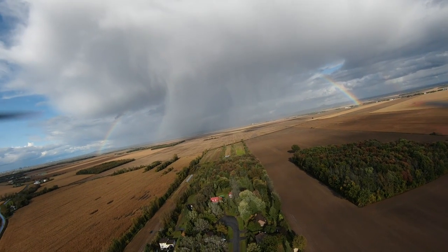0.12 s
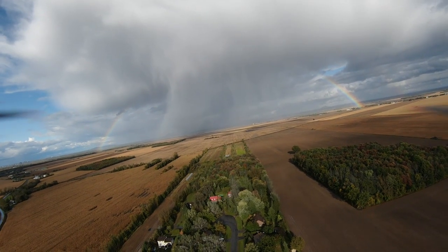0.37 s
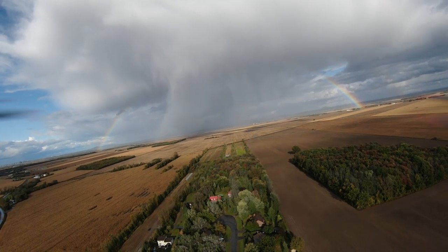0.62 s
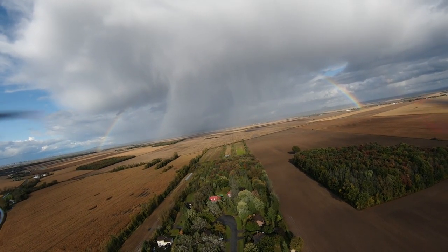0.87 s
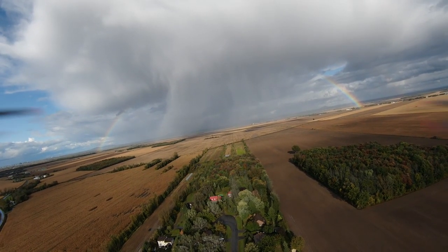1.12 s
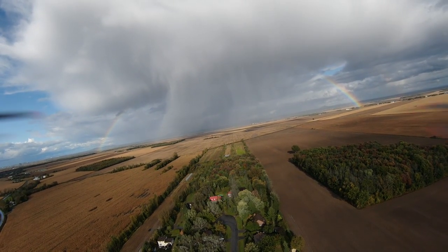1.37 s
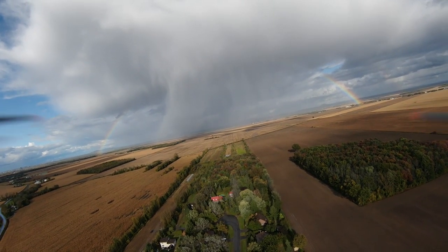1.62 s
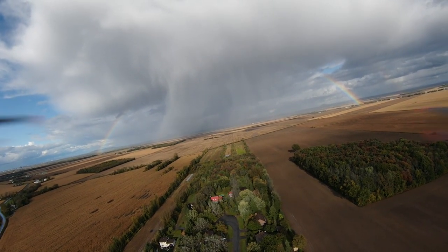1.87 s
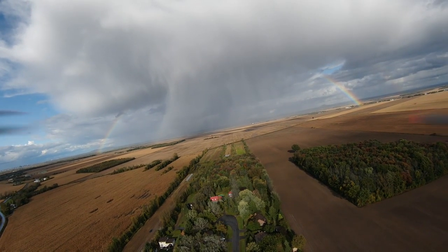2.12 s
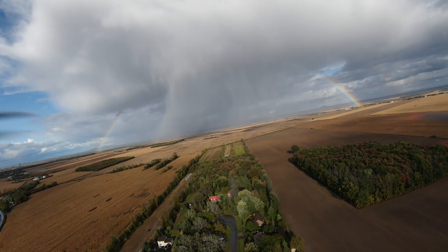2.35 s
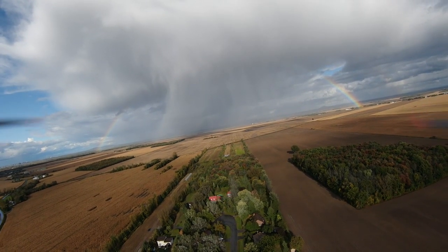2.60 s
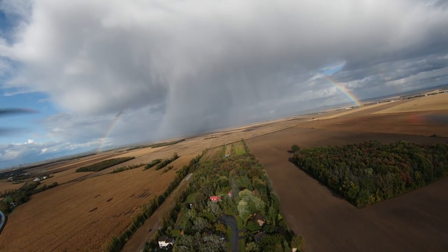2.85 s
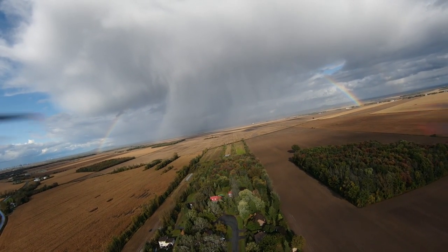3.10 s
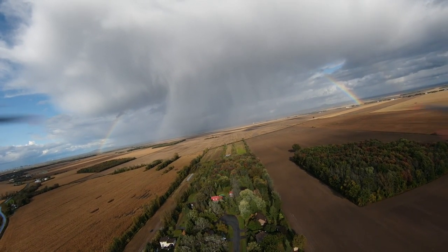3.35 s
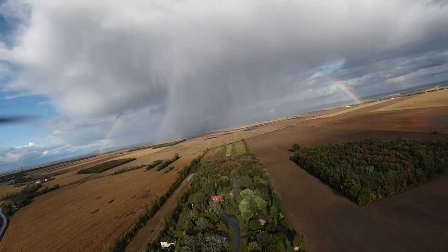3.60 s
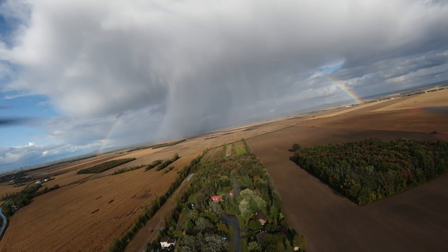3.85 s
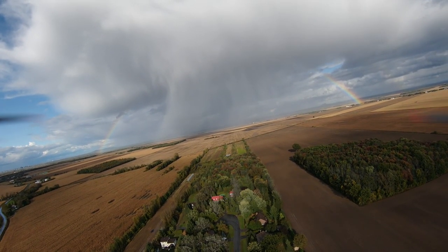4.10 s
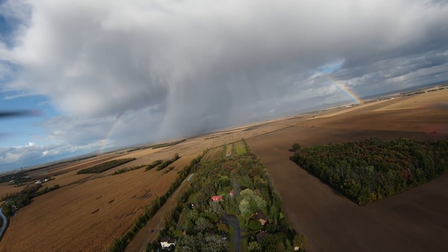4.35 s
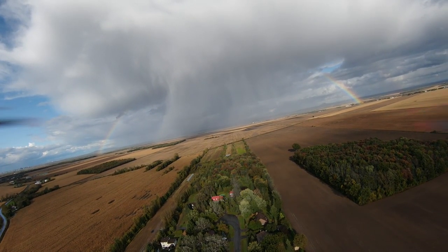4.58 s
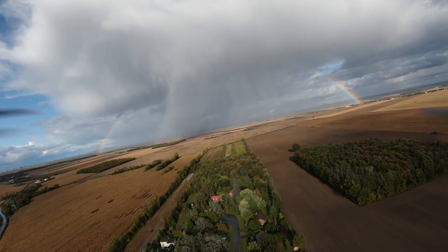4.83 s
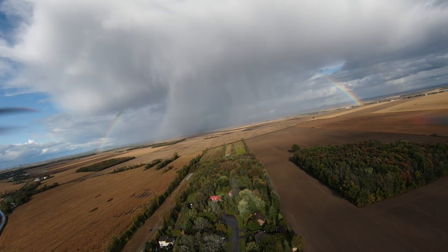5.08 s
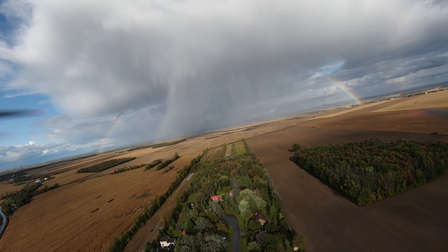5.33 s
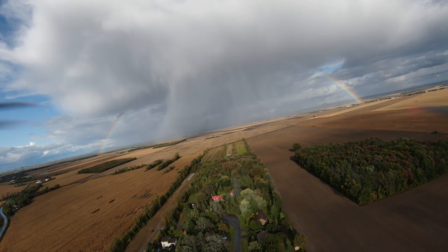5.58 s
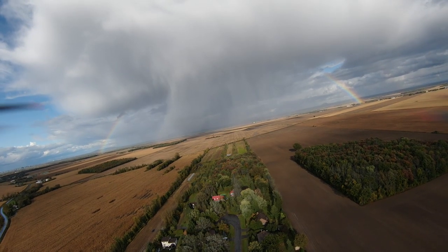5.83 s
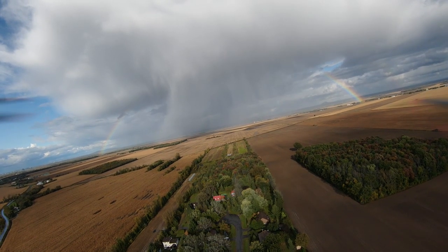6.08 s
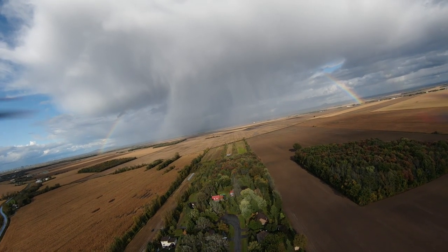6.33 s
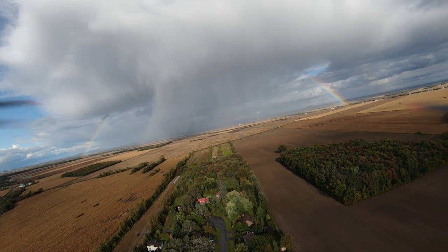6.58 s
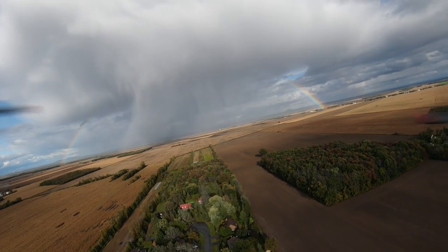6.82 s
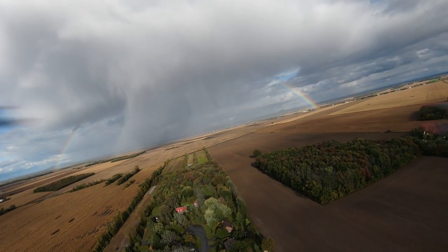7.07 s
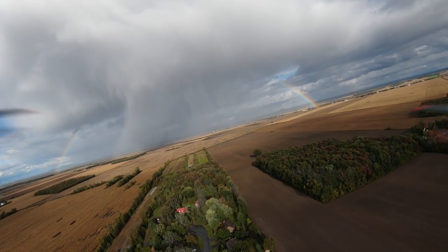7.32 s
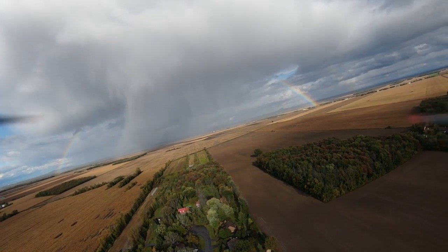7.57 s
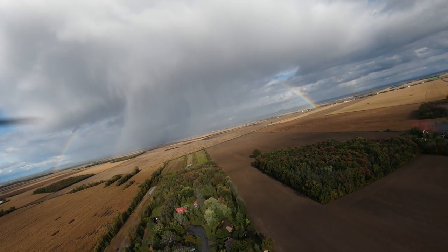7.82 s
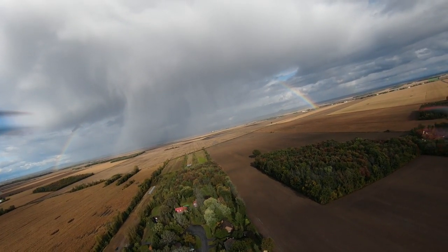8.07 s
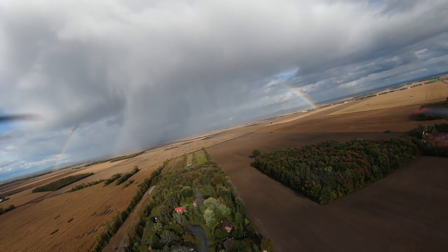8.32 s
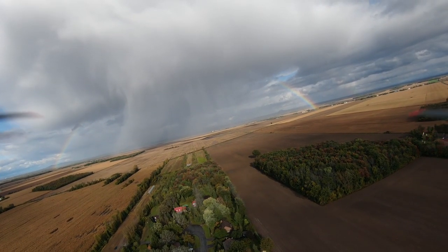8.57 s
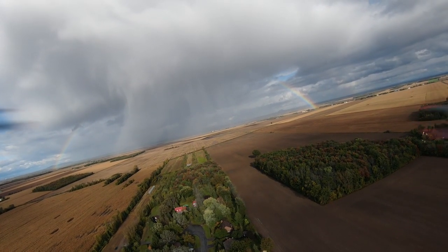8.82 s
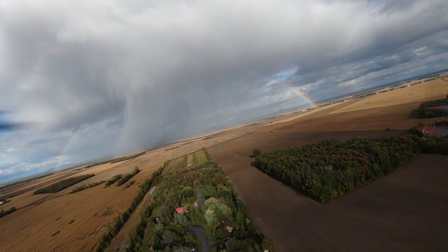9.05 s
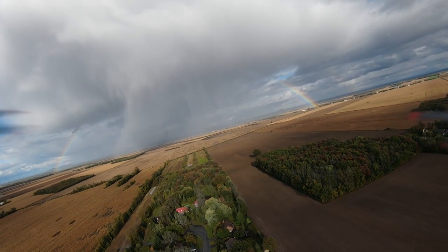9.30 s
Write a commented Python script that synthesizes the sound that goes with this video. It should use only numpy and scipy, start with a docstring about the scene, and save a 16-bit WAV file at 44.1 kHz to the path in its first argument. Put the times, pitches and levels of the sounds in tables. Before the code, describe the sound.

Four small drone motors hum and buzz steadily, their close tones beating together over rushing air, with one quick stumble and surge partway through.

```python
"""On the frame of a small drone in flight: four three-blade propellers at the two microphone ports of a camera.
Each motor is a stack of sines on its shaft orders; the motors turn at their own speeds, so their tones beat.
A short stick movement at 6.6 s makes the near and middle motors dip and the right one surge.
Shaped noise for blade turbulence and head wind fills the gaps; the camera cuts the treble steeply and adds faint hiss."""
import sys
import numpy as np
from scipy import signal
from scipy.fft import rfft, irfft, next_fast_len
from scipy.io import wavfile
from scipy.ndimage import uniform_filter1d, map_coordinates

SR = 44100
rng = np.random.default_rng(int(sys.argv[2]) if len(sys.argv) > 2 else 0)


def transcribe(u):
    """Save the signal u as a 16-bit wav file named by the first command-line argument.

    u: samples, shape (n,) or (channels, n), limited to [-1, 1]; the rate is SR.
    q: integer samples, one column per channel.
    """
    v = np.clip(np.atleast_2d(u).T, -1, 1)
    q = np.round(v * 32767).astype(np.int16)
    wavfile.write(sys.argv[1], SR, q)


def decibels_to_gain(level_db):
    """Convert a level in decibels to a linear amplitude gain (20 dB per decade)."""
    exponent = np.asarray(level_db, float) / 20
    return 10 ** exponent


N = 415863  # samples, 9.43 s


def along(hz, at_hz, values):
    """Values read on a log frequency axis."""
    return np.interp(np.log(hz + 1), np.log(np.asarray(at_hz) + 1), values)


def curves(rows):
    """One value per sample for each column after the time."""
    seconds, *columns = np.transpose(rows)
    return [np.interp(np.arange(N) / SR, seconds, column) for column in columns]


def wobble(rate):
    """A smooth random curve, rate knots a second, drawn as a spline every 64 samples."""
    knots = rng.standard_normal(N // 400)
    positions = np.arange(0, N + 64, 64) * rate / SR
    return map_coordinates(knots, [positions]).repeat(64)[:N]


def filtered(x, response):
    """x times a complex response of frequency."""
    m = next_fast_len(N + SR // 4)
    return irfft(rfft(x, m) * response(np.fft.rfftfreq(m, 1 / SR)), m)[..., :N]


# Frame resonances that lift a tone passing through them:
# (centre [Hz], half-width [Hz], left lift [dB], right lift [dB], added to the left port's lead [rad])
FRAME_RESONANCES = [(1026, 36, 3, 3, 0.00026), (2014, 32, 7.5, 6.5, 0.0018), (2423, 16, 1, 6.5, 0.0054),
                    (7900, 280, -0.5, 10, 0), (8340, 190, 7.5, 7.5, 0.00046)]
# The drone's attitude turns the propellers towards the camera after the stick movement;
# added to the blade tone and its octave: (time [s], level [dB])
ATTITUDE_LIFT = [(0, 0.5), (6.6, 0.5), (6.8, 1), (9.43, 2)]


def motor(speed, tones, arm, correct_percent, hunt, flutter_db, rough, load_db):
    """Sines on the shaft orders; the speed controller hunts a little and uneven inflow makes the tones flutter."""
    # the flight controller's small corrections, then the hunting of the speed controller
    blade_hz = curves(speed)[0] * (1 + correct_percent / 100 * wobble(16))
    shaft_hz = blade_hz / 3 * (1 + hunt * wobble(40))
    turn = 2 * np.pi * np.cumsum(shaft_hz) / SR
    faster_percent = 100 * (blade_hz / blade_hz.mean() - 1)
    out = np.zeros((2, N))
    for order, left_db, right_db, lead in tones:
        lift = 0
        for hz, half_width, *peak in FRAME_RESONANCES + arm:
            closeness = 1 / (1 + ((order * shaft_hz[::16] - hz) / half_width) ** 2)
            lift = lift + np.outer(peak, closeness)
        lift = lift.repeat(16, axis=1)[:, :N]
        lift_db, lead = lift[:2], lead + lift[2]
        if order in (3, 6):
            lift_db = lift_db + curves(ATTITUDE_LIFT)[0]
        if order == 3:
            lift_db = lift_db + load_db * faster_percent  # thrust changes the blade tone, dB per % of speed
        if order > 20:
            depth_db = 1.2  # the magnet whine flutters by a small fixed amount, alike for all motors
        elif order > 2:
            depth_db = flutter_db * min(order - 2, 5) ** rough  # higher orders feel the turbulence more
        else:
            depth_db = 3
        flutter = depth_db * (0.087 * wobble(4.0) + 0.81 * wobble(26))
        size = np.sqrt(2) * decibels_to_gain(lift_db + flutter)  # peak of a sine from its rms level
        smear = 0.16 * depth_db * wobble(20)
        phase = order * turn + rng.uniform(0, 2 * np.pi) + smear
        left, right = decibels_to_gain(left_db) * np.sin(phase + lead), decibels_to_gain(right_db) * np.sin(phase)
        out += size * np.array([left, right])
    return out


# Near motor's speed as the drone holds its attitude, stick movement at 6.6 s: (time [s], blade rate [Hz])
NEAR_BLADE_RATE = [(0.0, 520), (0.08, 513), (0.14, 504.3), (0.22, 498.3), (0.27, 483), (0.43, 500.5),
                   (0.49, 496), (0.72, 506), (0.76, 512.3), (0.83, 499), (0.94, 494.6), (1.06, 507.8),
                   (1.19, 490.3), (1.27, 495.3), (1.36, 509), (1.42, 498), (1.5, 507.4), (1.6, 494.4),
                   (1.74, 487), (1.8, 494), (1.89, 489), (1.96, 502), (2.04, 498.4), (2.09, 503.8),
                   (2.15, 495.7), (2.24, 503.3), (2.32, 502.8), (2.39, 506), (2.5, 495.4), (2.62, 499),
                   (2.93, 488.8), (3.48, 503.5), (3.57, 497.2), (3.65, 503.5), (3.73, 500.3), (3.96, 502.4),
                   (4.05, 490.8), (4.08, 497), (4.16, 492.5), (4.28, 501.4), (4.54, 489.5), (4.65, 492.3),
                   (4.72, 500.4), (4.95, 491.8), (5.12, 512), (5.19, 499), (5.32, 490), (5.57, 499.4),
                   (5.61, 497.5), (5.72, 500.2), (5.83, 505.3), (5.93, 503.7), (6.0, 487.4), (6.12, 491.4),
                   (6.16, 486.4), (6.28, 499), (6.37, 488.6), (6.45, 497.0), (6.5, 492.6), (6.56, 493),
                   (6.58, 492.3), (6.62, 453.2), (6.645, 442.4), (6.67, 464), (6.7, 501.2), (6.74, 518.6),
                   (6.81, 519.1), (6.88, 523.8), (6.91, 522.4), (6.97, 508.8), (7.06, 513.6), (7.22, 499.2),
                   (7.38, 507), (7.44, 500.6), (7.64, 498.7), (7.71, 502), (7.87, 505.5), (8.03, 492.5),
                   (8.1, 498), (8.2, 489.9), (8.33, 492.5), (8.47, 483.3), (8.63, 485.7), (8.68, 492),
                   (8.76, 488.2), (8.88, 501.2), (9.03, 494.5), (9.11, 484.6), (9.17, 494.8), (9.31, 488),
                   (9.36, 502.5), (9.43, 500)]
# Its tones at the two ports; order 3 is the blade rate, 21 and up the magnet commutation:
# (shaft order [-], left level [dB], right level [dB], left port leads by [rad])
NEAR_ORDERS = [(1, -62, -69, 0.6), (2, -65.5, -68, 0.3), (3, -39, -45.5, 0.56), (6, -57, -61.5, 0.74),
               (7, -67, -64, -1), (8, -55.5, -67.5, 3.5), (9, -64.5, -59, -2), (11, -65.5, -64, 1.5),
               (12, -63, -70.5, 0.6), (14, -62.5, -57, -1), (15, -70.5, -75, -2), (18, -77, -78, -5.5),
               (21, -67.5, -66.5, -2.5), (42, -37.5, -54.5, 4)]
# Its arm lifts the octave of the blade tone:
# (centre [Hz], half-width [Hz], left lift [dB], right lift [dB], added to the left port's lead [rad])
NEAR_ARM_RESONANCES = [(1001, 18, 6, 6, 0)]


def near_motor():
    """The near motor, its blade tone the strongest at the left port; it dips at the stick movement."""
    return motor(NEAR_BLADE_RATE, NEAR_ORDERS, NEAR_ARM_RESONANCES, correct_percent=0.1,
                 hunt=0.0024, flutter_db=0.35, rough=1.2, load_db=0.1)


# Right motor's speed: (time [s], blade rate [Hz])
RIGHT_BLADE_RATE = [(0.0, 506.3), (0.16, 510.9), (0.26, 524.1), (0.37, 506.3), (0.55, 506.2), (0.62, 497.2),
                    (0.969, 497.6), (1.05, 488.5), (1.29, 505.6), (1.41, 495.1), (1.51, 495.1),
                    (1.61, 487.6), (1.69, 497.7), (1.9, 500.1), (2.03, 492.6), (2.24, 500.4), (2.82, 485.3),
                    (2.9, 495.7), (3.11, 486.1), (3.39, 491.6), (3.45, 500.3), (3.56, 503.5), (3.68, 495.9),
                    (3.87, 506.5), (4.04, 498.7), (4.63, 499.1), (4.83, 491), (5.009, 507.3), (5.32, 500.0),
                    (5.7, 513.1), (6.0, 516), (6.08, 510.9), (6.15, 518), (6.24, 518.1), (6.32, 504.3),
                    (6.44, 508), (6.54, 526), (6.59, 547), (6.64, 532.7), (6.67, 512), (6.711, 516.7),
                    (6.76, 529), (6.86, 523.5), (6.95, 536), (7.09, 522), (7.2, 525.4), (7.37, 527),
                    (7.52, 541.9), (7.68, 553.3), (7.94, 536.8), (8.02, 542), (8.1, 534.3), (8.2, 539.5),
                    (8.3, 531), (8.45, 516.5), (8.55, 514), (8.7, 503.3), (8.871, 512.7), (9.03, 500.7),
                    (9.15, 512.5), (9.32, 519), (9.43, 513)]
# Its tones: (shaft order [-], left level [dB], right level [dB], left port leads by [rad])
RIGHT_ORDERS = [(1, -65, -63.5, 0.9), (3, -59.5, -56, 0), (6, -68, -63, -0.4), (7, -68.5, -65.5, -2.2),
                (9, -62, -66.5, 1), (11, -61, -68, -1.5), (13, -63.5, -58.5, 2.5), (14, -57.5, -66, -2),
                (42, -55, -46.5, -3), (48, -80.5, -68, 1.5)]


def right_motor():
    """The right motor surges at the stick movement, and its blade tone grows with speed."""
    return motor(RIGHT_BLADE_RATE, RIGHT_ORDERS, [], correct_percent=0.3,
                 hunt=0.003, flutter_db=0.7, rough=0.9, load_db=0.7)


# Middle motor's speed: (time [s], blade rate [Hz])
MIDDLE_BLADE_RATE = [(0.0, 508.3), (0.1, 514.5), (0.22, 503.5), (0.34, 508.4), (0.45, 505), (0.55, 514),
                     (0.66, 515.3), (0.77, 511.8), (0.85, 515), (1.05, 499.4), (1.16, 509.7), (1.25, 506.1),
                     (1.37, 509), (1.52, 507), (1.6, 501.6), (1.68, 509.5), (1.81, 503.1), (1.97, 507.7),
                     (2.04, 510.6), (2.11, 506.2), (2.23, 513.5), (2.31, 520.9), (2.42, 510), (2.52, 503.1),
                     (2.63, 505.6), (2.9, 496.8), (3.2, 504.4), (3.39, 508.5), (3.55, 511.2), (3.75, 507),
                     (4.05, 513.3), (4.25, 503.6), (4.36, 505.5), (4.52, 500), (4.75, 507.3), (4.88, 503.7),
                     (5.04, 517.7), (5.17, 513.4), (5.3, 506.4), (5.7, 517), (5.85, 512), (5.93, 515.4),
                     (6.12, 504.7), (6.22, 514.7), (6.41, 505), (6.54, 515.8), (6.6, 500), (6.65, 468.9),
                     (6.69, 483.5), (6.73, 506.5), (6.91, 502.6), (7.04, 489.3), (7.2, 489), (7.26, 485.4),
                     (7.38, 484), (7.52, 492.2), (7.6, 486.5), (7.78, 491.4), (7.86, 479.7), (7.96, 484),
                     (8.25, 477), (8.35, 478.7), (8.45, 474.2), (8.6, 476.8), (8.68, 468.4), (8.78, 474.2),
                     (8.99, 469.5), (9.2, 477), (9.32, 476.6), (9.43, 463.4)]
# Its tones: (shaft order [-], left level [dB], right level [dB], left port leads by [rad])
MIDDLE_ORDERS = [(3, -50.5, -55, 0.28), (5, -66.5, -66.5, 0), (6, -51.5, -50.5, 0), (7, -63, -63, -3.5),
                 (9, -57, -68, 2), (17, -69, -73, 2.5), (21, -69.5, -70, -5), (42, -49.5, -54, -1.5)]


def middle_motor():
    """The middle motor dips at the stick movement and slows after it; its blade tone follows speed most."""
    return motor(MIDDLE_BLADE_RATE, MIDDLE_ORDERS, [], correct_percent=0.08,
                 hunt=0.0025, flutter_db=1.1, rough=0.6, load_db=1.2)


# Fast motor's speed: (time [s], blade rate [Hz])
FAST_BLADE_RATE = [(0.0, 668), (0.14, 663), (0.28, 673), (0.4, 657), (0.64, 664), (1.0, 650.4),
                   (1.1, 642.6), (1.2, 647), (1.3, 647.4), (1.44, 656), (1.56, 650.5), (1.83, 648.6),
                   (2.32, 658.5), (2.42, 647.6), (2.82, 645), (2.9, 641.5), (3.02, 644.3), (3.131, 643),
                   (3.26, 650), (3.37, 648.2), (3.53, 657), (3.77, 653.4), (4.02, 659.2), (4.37, 657),
                   (4.53, 646.8), (4.75, 654.7), (4.89, 642), (5.05, 657), (5.19, 659.2), (5.3, 651),
                   (5.949, 668.8), (6.07, 663.6), (6.13, 658.4), (6.22, 663.4), (6.32, 653), (6.38, 651),
                   (6.46, 657), (6.52, 667), (6.59, 685.8), (6.665, 651.6), (6.76, 685), (6.87, 664.1),
                   (6.9, 662), (6.971, 684.4), (7.1, 674.7), (7.27, 681), (7.4, 674.7), (7.62, 690),
                   (8.27, 681.5), (8.49, 663.5), (8.65, 660), (8.99, 660), (9.06, 654), (9.2, 667.6),
                   (9.43, 669)]
# Its tones: (shaft order [-], left level [dB], right level [dB], left port leads by [rad])
FAST_ORDERS = [(1, -63.5, -67.5, 1.2), (3, -52.5, -50.5, 1.89), (6, -61, -54, 3.5), (7, -58.5, -69.5, -3),
               (9, -52.5, -67.5, -0.5), (10, -70.5, -61.5, 1.5), (11, -69.5, -60, -1.5),
               (12, -56.5, -74.5, 3), (13, -63, -61, -3), (14, -72, -68, 2.5), (15, -59.5, -72.5, 1.25),
               (21, -52, -69, -2.5), (42, -68.5, -67, 3)]
# Its arm has resonances of its own:
# (centre [Hz], half-width [Hz], left lift [dB], right lift [dB], added to the left port's lead [rad])
FAST_ARM_RESONANCES = [(1284, 24, 16, 5.5, 0), (1284, 12, 0, 0, -2.8), (1360, 40, 0, 6.5, 0),
                       (2055, 40, 0, 5, 0)]


def fast_motor():
    """The fast motor's blade tone lies well above the other three."""
    return motor(FAST_BLADE_RATE, FAST_ORDERS, FAST_ARM_RESONANCES, correct_percent=0.12,
                 hunt=0.002, flutter_db=0.88, rough=0.2, load_db=-0.05)


# Air rush at the two ports, before the camera's cut:
# (frequency [Hz], left level [dB per Hz], right level [dB per Hz], likeness of the ports [0-1], left port leads by [rad])
RUSH_SPECTRUM = [(15, -78.5, -80, 0.8, 0.5), (45.3, -70, -71, 1, 0), (170, -70, -75.5, 0.7, 0),
                 (410, -77, -80.5, 0.7, -0.17), (1060, -78, -76.5, 0.6, -0.15),
                 (1220, -73, -78, 0.04, -0.5), (1230, -73, -77.5, 0.95, 0.05),
                 (1390, -73, -79.5, 0.9, -1.96), (1580, -72.5, -77, 1, -2), (1670, -76, -79, .4, .2),
                 (1745, -82, -83, .5, .8), (1830, -74.5, -77.5, 0.2, -0.24), (1975, -73.5, -79.5, 0.3, 2),
                 (2480, -76, -80.5, 0.1, 2.5), (2840, -79, -87.5, 0.5, 3), (3180, -79.5, -84, 1, 4.5),
                 (3550, -83.5, -88.5, 0.5, 5), (4640, -92.5, -92.5, 0.6, 4.5), (5800, -75, -79, 0.5, 3.5),
                 (6900, -76, -76.5, 0.9, 4), (7600, -100, -95, 0.05, 10)]
# Head wind in the lows; only the rise and fall about the mean is used: (time [s], level [dB])
WIND_GUSTS = [(0.0, -48), (2.73, -45), (4.41, -46.5), (4.67, -44.5), (5.07, -47.5), (6.3, -48.5),
              (6.7, -48), (7.3, -48), (7.7, -50.5), (8.67, -46.5), (9.43, -47.5)]


def rush():
    """Noise in patches of random gain; the ports share part of it, and wind and blades swell apart."""
    patchy_db, split_hz, wind_swell_db, blade_swell_db = 0.75, 330, 0.75, 0.46
    hz, left_db, right_db, alike, lead = np.transpose(RUSH_SPECTRUM)

    z = signal.stft(rng.standard_normal((2, N + 512)), nperseg=512)[2]
    field = rng.standard_normal(z.shape[1:])
    field = uniform_filter1d(uniform_filter1d(field, size=4, axis=0), size=10, axis=1)
    patches = z * decibels_to_gain(patchy_db * field / field.std())
    noise = signal.istft(patches, nperseg=512)[1][:, :N] * np.sqrt(SR / 2)  # about unit power per Hz

    gust_db, = curves(WIND_GUSTS)
    wind = decibels_to_gain(gust_db - gust_db.mean() + wind_swell_db * wobble(4.9))
    blades = decibels_to_gain(blade_swell_db * wobble(2.3))
    low = filtered(noise, lambda f: 1 / (1 + (f / split_hz) ** 4))
    shared, apart = low * wind + (noise - low) * blades

    def angle(f):
        """Mixing angle that gives the two ports their likeness."""
        return np.arccos(np.clip(along(f, hz, alike), 0, 1)) / 2

    def colour(f):
        """Level of each port, with the left one's phase lead."""
        left = decibels_to_gain(along(f, hz, left_db)) * np.exp(1j * along(f, hz, lead))
        return np.array([left, decibels_to_gain(along(f, hz, right_db))])

    mid = filtered(shared, lambda f: np.cos(angle(f)))
    side = filtered(apart, lambda f: np.sin(angle(f)))
    return filtered(np.array([mid + side, mid - side]), colour)


# Slope of the camera's treble cut: (frequency [Hz], level [dB])
TREBLE_CUT = [(3100, 0.5), (3500, -10), (4150, -25), (4600, -40), (9000, -44)]
# Dead spots between its faint leaks: (centre [Hz], half-width [Hz])
DEAD_SPOTS = [(4310, 110), (5010, 170), (6130, 260), (7420, 67), (8750, 200)]


def camera(hz):
    """A steep low-pass whose stop band leaks between a few nulls."""
    nulls = 1
    for at_hz, half_width in DEAD_SPOTS:
        nulls = nulls * (1 - 1 / (1 + ((hz - at_hz) / half_width) ** 4))
    return decibels_to_gain(along(hz, *np.transpose(TREBLE_CUT))) * nulls


def hiss():
    """Camera electronics: unrelated white noise on each channel, high-passed, so heard only above the cut."""
    lowest_hz, left_db, right_db = 9650, -101, -108  # levels of the white noise before the high-pass
    noise = filtered(rng.standard_normal((2, N)), lambda f: f > lowest_hz)
    return noise * decibels_to_gain([[left_db], [right_db]])


def scene():
    """Motor tones over the air rush."""
    return near_motor() + right_motor() + middle_motor() + fast_motor() + rush()


def roll_off(x):
    """The treble ends steeply here."""
    return signal.sosfilt(signal.butter(12, 15700, fs=SR, output="sos"), x)


def record(dry):
    """The camera's treble cut on both ports, with its hiss added."""
    mix = filtered(dry, camera) + hiss()
    return roll_off(mix)


dry = scene()
out = record(dry)
transcribe(out)
```